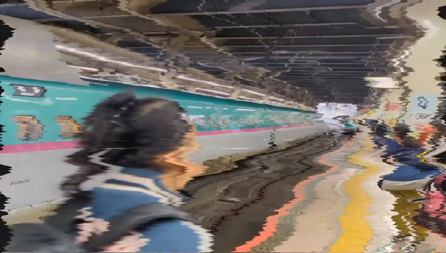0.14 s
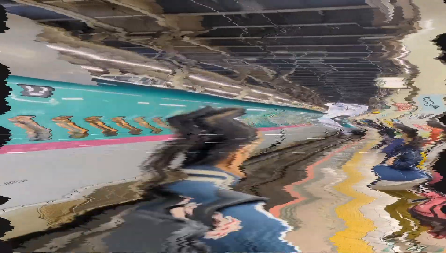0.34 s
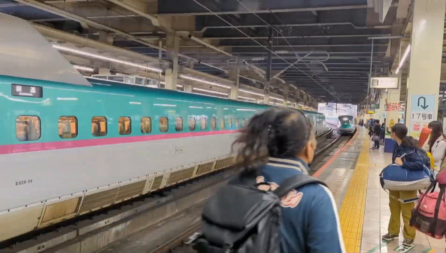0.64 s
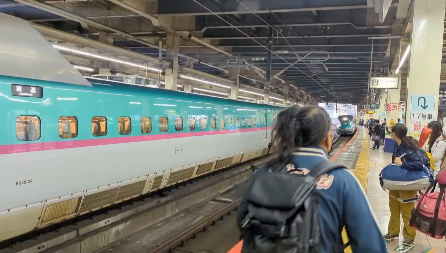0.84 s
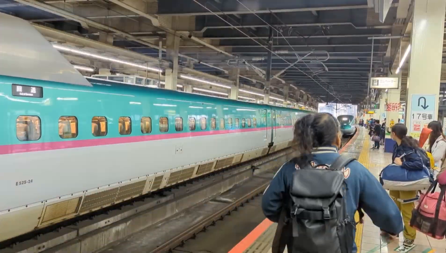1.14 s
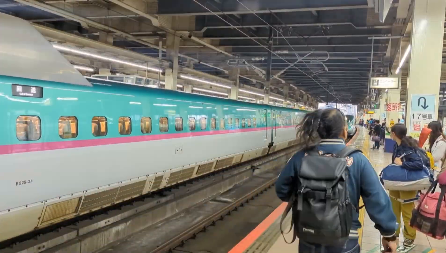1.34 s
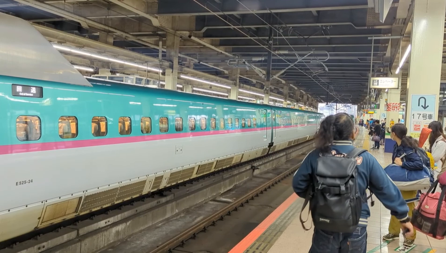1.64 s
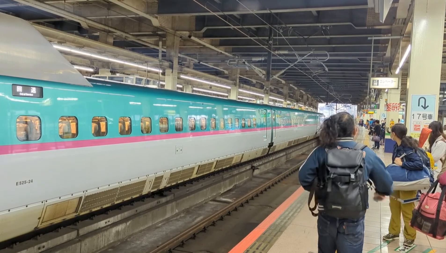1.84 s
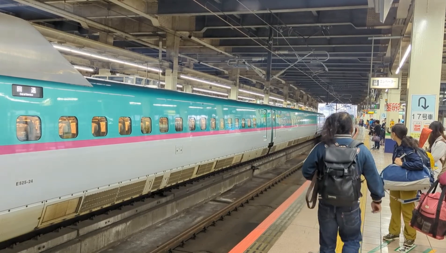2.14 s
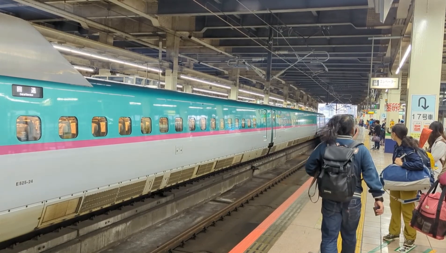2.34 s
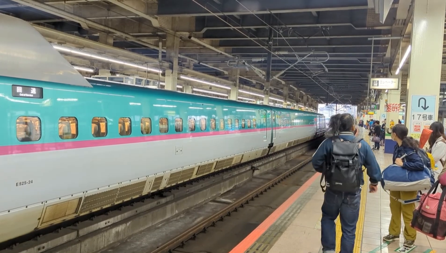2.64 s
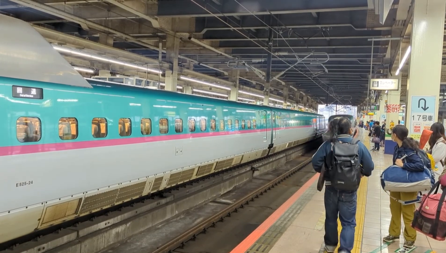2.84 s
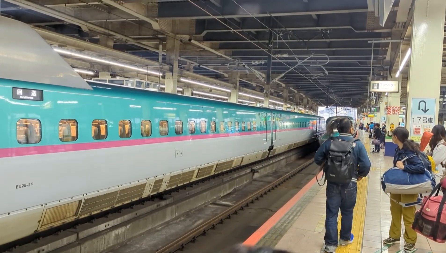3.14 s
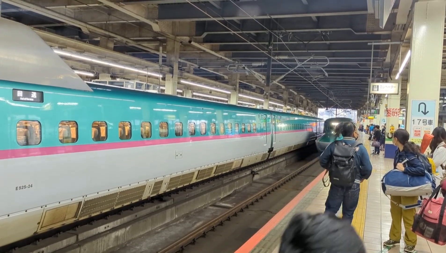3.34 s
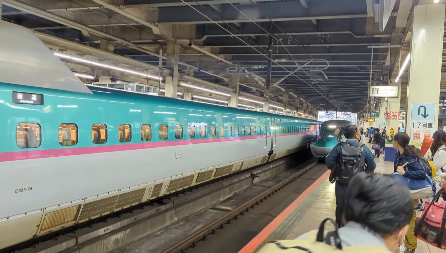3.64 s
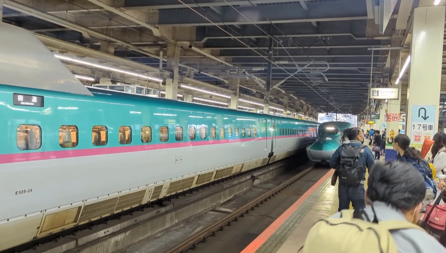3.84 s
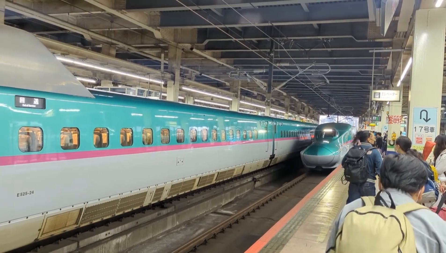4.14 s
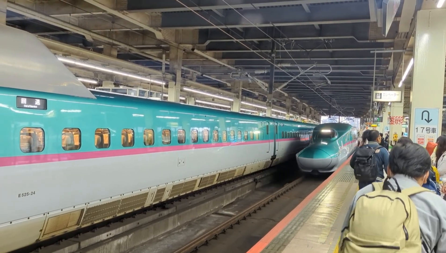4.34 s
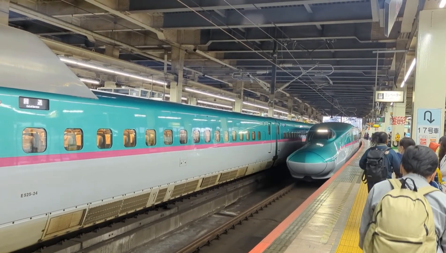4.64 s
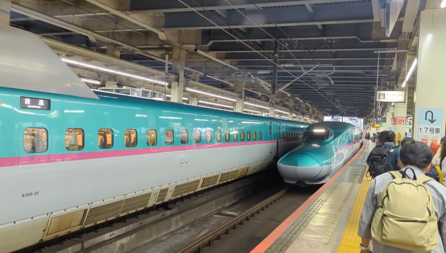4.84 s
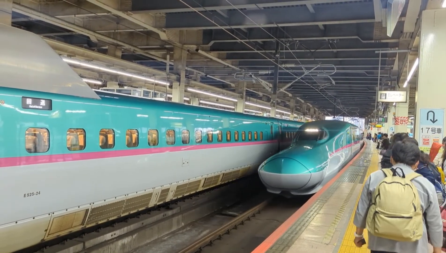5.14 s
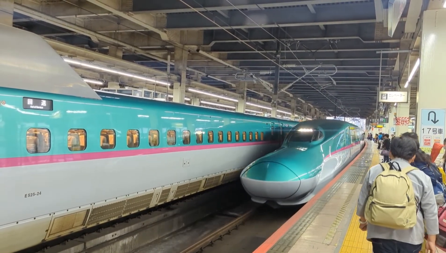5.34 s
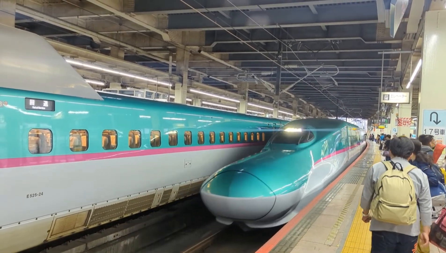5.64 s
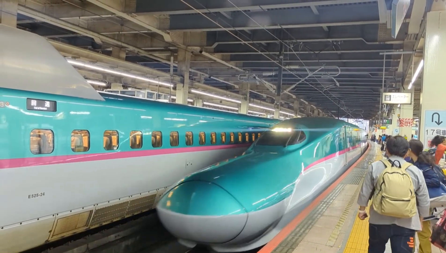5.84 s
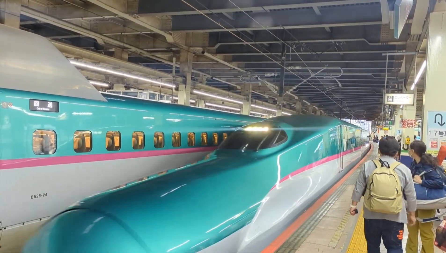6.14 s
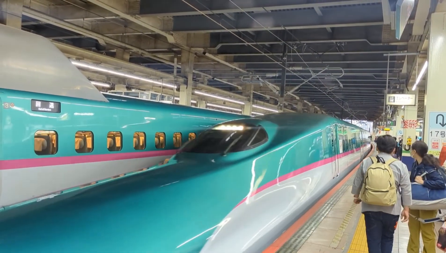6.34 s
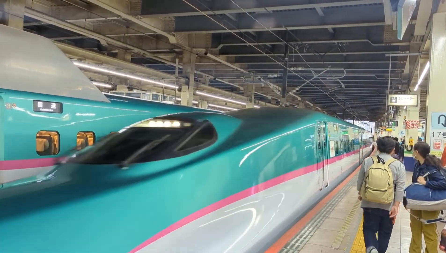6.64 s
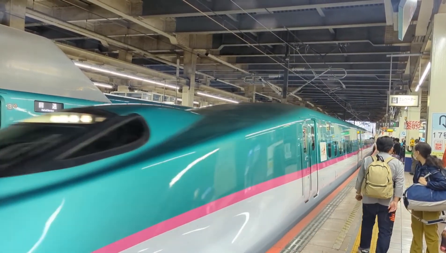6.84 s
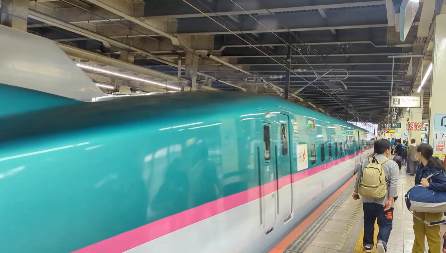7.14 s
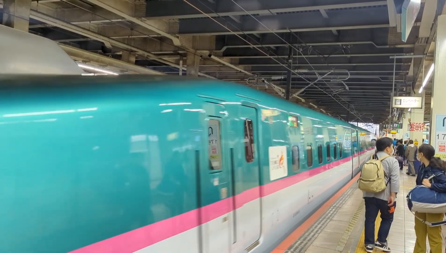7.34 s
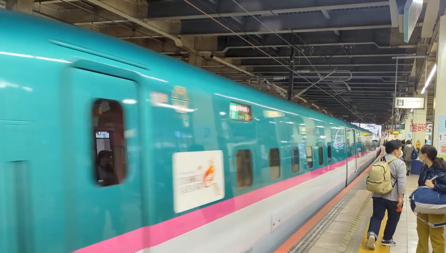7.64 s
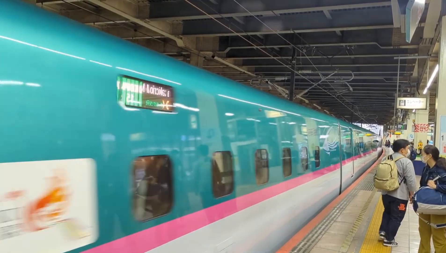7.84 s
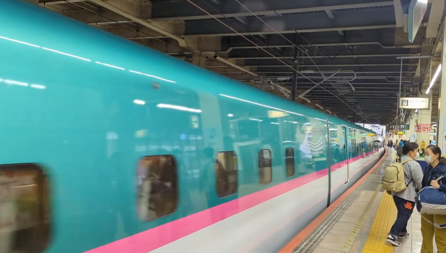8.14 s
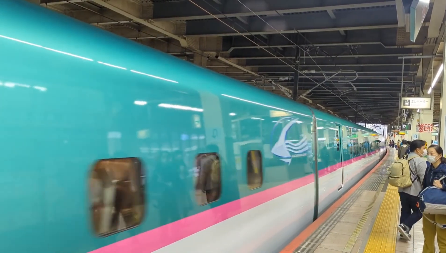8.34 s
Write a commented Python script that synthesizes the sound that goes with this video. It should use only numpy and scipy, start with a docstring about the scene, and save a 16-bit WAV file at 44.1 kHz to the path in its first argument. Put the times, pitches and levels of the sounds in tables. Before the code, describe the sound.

A train runs into a covered station, braking. Low hall roar and fans come first, with a wavering whine that sinks as it slows. The metallic brake squeal grows from thin and distant to close and shrill, with tiny very high squeaks pulsing through the middle. As the nose passes the handheld phone, the squeal drops slightly in pitch and broadens, with airy hiss on the left.

```python
"""The brakes of an electric train squeal in chorus as it runs into a roofed station and its nose slides
past a phone held on the platform: many pads slip and grip near one rate, each giving five harmonics.
The gears whine down with the speed, rising and fading by frequency, and one thin squeak swells once
a wheel turn. Shaped noise makes the roar of the hall and the hiss of air and wheels; blurred tones make
the hum of a standing train's fans."""
import sys
import numpy as np
from scipy import signal
from scipy.fft import rfft, irfft, next_fast_len
from scipy.io import wavfile
from scipy.ndimage import uniform_filter1d, minimum_filter1d

SR = 44100
rng = np.random.default_rng(int(sys.argv[2]) if len(sys.argv) > 2 else 0)


def output_pcm(signal):
    """Save a mono or channel-first signal as 16-bit PCM at the path in sys.argv[1].

    Samples are clipped to [-1, 1] before scaling.
    """
    pcm = np.clip(np.atleast_2d(signal).T, -1, 1) * 32767
    wavfile.write(sys.argv[1], SR, np.round(pcm).astype(np.int16))


N = 374409

# Coherence of the sound field at the two ports of the phone.
# Each row: frequency in Hz, left-right correlation from -1 to 1.
LIKENESS = [(45, .99), (90, .988), (180, .972), (350, .87), (700, .53), (1400, -.08), (4000, 0), (9000, .2),
            (16000, .2)]


def undb(db):
    """Definition of level: the amplitude ratio is 10 to the power dB / 20."""
    return 10 ** (np.asarray(db) / 20)


def unit(x):
    """Normalisation by the root mean square, which becomes 1."""
    return x / np.sqrt(np.mean(x ** 2))


def curves(table):
    """Linear interpolation in time: the columns after the first (in seconds), sample by sample."""
    s, *columns = np.transpose(table)
    return [np.interp(np.arange(N) / SR, s, column) for column in columns]


def over_log_hz(table, hz):
    """Linear interpolation of a table's second column over the logarithm of frequency."""
    table_hz, values = np.transpose(table)
    return np.interp(np.log(hz), np.log(table_hz), values)


def step(at_s, width_s):
    """Sigmoid transition from 0 to 1 about a moment."""
    return .5 + .5 * np.tanh((np.arange(N) / SR - at_s) / (2 * width_s))


def walk(rate_hz):
    """Band-limited random modulation: values held for 1 / rate, smoothed twice, rms 1."""
    hold = max(int(SR / rate_hz), 2)
    held = np.repeat(rng.standard_normal(N // hold + 1), hold)
    smooth = uniform_filter1d(uniform_filter1d(held, hold), hold)
    return unit(smooth[:N])


def sides(left_db):
    """Interaural level difference: gains of left and right, left_db apart."""
    return undb(np.array([left_db, -left_db]) / 2).reshape(2, -1)


def correlated(mid, side, like):
    """Partial coherence: a shared and an opposed part weighted to a left-right correlation."""
    return np.sqrt(1 + like) * mid + np.sqrt(1 - like) * side * np.array([[1], [-1]])


def rotor(hz):
    """Phasor of an oscillator: phase is the integral of frequency, from a random start."""
    return np.exp(2j * np.pi * (np.cumsum(hz) / SR + rng.random())).astype(np.complex64)


def field(spectrum, swell_db, flicker_db, bass_db=0, middle_db=0, treble_db=0):
    """Diffuse field: partly coherent noise in octave bands that swell together and flicker alone."""
    size = next_fast_len(N)
    hz = np.maximum(np.fft.rfftfreq(size, 1 / SR), 1)
    like = np.clip(over_log_hz(LIKENESS, hz), -1, 1)
    mid, side = rfft(rng.standard_normal((2, size))) * undb(over_log_hz(spectrum, hz))
    both = correlated(mid, side, like)
    out, swell = 0, swell_db * walk(3.16)
    for centre in 2. ** np.arange(5, 15):  # Hz
        band = np.clip(1 - np.abs(np.log2(hz / centre)), 0, 1)
        level_db = swell + flicker_db * walk(9)
        level_db = level_db + bass_db * (centre < 150)
        level_db = level_db + middle_db * (400 < centre < 1200)
        level_db = level_db + treble_db * (centre > 12000)
        out = out + irfft(both * band, size)[:, :N] * undb(level_db)
    return unit(out)


def wavering(hz, width_hz, steady=0.):
    """Multipath interference: echoes blur a tone, unlike at each port, about a steady direct share."""
    def blur():
        return (steady + walk(width_hz) + 1j * walk(width_hz)) / np.sqrt(1 + steady ** 2 / 2)

    tone = rotor(hz)
    like = np.clip(over_log_hz(LIKENESS, np.mean(hz)), 0, 1)
    mid, side = (tone * blur()).imag, (tone * blur()).real
    return correlated(mid, side, like) / np.sqrt(2)  # rms near 1


def hall():
    """Reverberant field: roar under the roof with fan tones in it, and broadband hiss of the cars."""
    # Each row: start in seconds, level of the roar in dB, level of the hiss near 4.5 kHz in dB.
    noise_levels = [(0, -27.5, -60), (.45, -21, -52), (.9, -20, -51), (1.75, -19.5, -49), (2.1, -19, -49.5),
                    (2.66, -19.5, -49), (2.96, -19.5, -48.5), (3.55, -18, -47.5), (3.76, -19.5, -47),
                    (3.86, -18.5, -45), (4.05, -19, -47.5), (4.62, -18.5, -45), (4.74, -22, -47),
                    (5.5, -24, -45.5), (5.85, -23.5, -45.5), (6.1, -26.5, -48.5), (6.3, -25.5, -46.5),
                    (7.35, -21.5, -41), (7.7, -22.5, -43.5), (8.49, -22, -43.5)]
    # Spectrum of the roar. Each row: frequency in Hz, relative density in dB per Hz.
    roar_spectrum = [(15, -55), (25, -54), (57, -3), (85, -1), (192, -3.5), (358, -5), (427, -6.5),
                     (528, -8.5), (707, -9), (965, -13.5), (1700, -15), (2600, -25.5), (3380, -32),
                     (5720, -120)]
    # Spectrum of the hiss, with a narrow gap near 8 kHz.
    # Each row: frequency in Hz, relative density in dB per Hz.
    hiss_spectrum = [(300, -10.5), (900, -10), (2000, -0.5), (3500, -5), (5000, -12), (7200, -12.5),
                     (8000, -33.5), (8800, -11), (10500, -16), (12500, -20.5), (13800, -18), (15500, -30)]
    # Fans of a standing train. Each row: frequency in Hz, blur rate in Hz, level re the roar in dB.
    fan_tones = [(98.1, 50, -17), (194.6, 40, -17), (438.7, 30, -18), (1185, 35, -24), (1638, 30, -23)]
    # Rumble of the viaduct. Each row: start in seconds, gain of the roar below 150 Hz in dB.
    rumble_curve = [(0, -1), (1, 1.5), (1.6, 2), (2.3, 1.5), (3.2, 0.5), (3.8, 0.5), (4.5, -0.5), (5.2, 1),
                    (5.9, 0), (6.6, -0.5), (7.5, 0), (8.49, -2.5)]
    # Brief swells in the middle of the roar. Each row: peak in seconds, half length in seconds, gain in dB.
    surges = [(2.8, .09, 3), (3.88, .06, 2)]
    # Each row: start in seconds, gain of the top octave of the hiss in dB.
    treble_curve = [(0, -0.5), (2.5, 1.5), (4.5, 1.5), (8.49, -5)]
    whole_hiss_db = 16  # whole hiss relative to its part near 4.5 kHz
    hiss_left_db = 2  # the cars pass on the left

    roar_db, hiss_db = curves(noise_levels)
    rumble_db = curves(rumble_curve)[0] + .4 * walk(1.42)
    t = np.arange(N) / SR
    surge_db = sum(db * np.exp(-((t - s) / half) ** 2 / 2) for s, half, db in surges)
    roar = field(roar_spectrum, .52, .76, bass_db=rumble_db, middle_db=surge_db)
    fans = sum(wavering(np.full(N, 1. * hz), width) * undb(db) for hz, width, db in fan_tones)
    hiss = field(hiss_spectrum, swell_db=.7, flicker_db=.9, treble_db=curves(treble_curve)[0])
    hiss = hiss * sides(hiss_left_db)
    return (roar + fans) * undb(roar_db) + hiss * undb(hiss_db + whole_hiss_db)


def chorus():
    """Doppler shift and distance: pitch, balance and spread of the squeal as the nose nears and passes."""
    # Each row: start in seconds, level of the 2nd harmonic in dB before the make-up gain in brakes().
    squeal_curve = [(0, -40), (.4, -33), (1.4, -26.5), (1.9, -23), (3.4, -17.5), (4.2, -13.5), (4.7, -13),
                    (5.7, -12), (6.2, -13.5), (6.6, -13), (7.4, -12.5), (8, -14.5), (8.49, -15.5)]
    t, passed = np.arange(N) / SR, step(6.4, .33)  # middle and width of the passing in s
    # the slip rate sags with the speed and drops as the cars turn from coming to going
    slip_hz, sag_hz_per_s, pass_drop_hz = 3182, 7, 70.1
    wander_percent = .17  # slow drift of the whole chorus, rms
    hz = slip_hz - sag_hz_per_s * t - pass_drop_hz * passed
    hz = hz * (1 + wander_percent / 100 * walk(5))
    # harmonics 1, 3 and 4 in dB relative to the 2nd; the upper two carry once the cars are near
    first_db = -10 - 1.01 * t + 8.5 * passed
    third_db = -41 + 14 * step(3.9, .8)
    fourth_db = -29 + 10 * step(4.1, .85)
    spread_percent = .75 + .9 * passed  # pitch spread for a pad offset of 1
    stray_db = -3 - .7 * t - 11 * passed  # share of the stray pads
    pan_db = -3.5 + 5 * passed  # left minus right, 2nd harmonic only
    squeal_db = curves(squeal_curve)[0]
    return hz, squeal_db, first_db, third_db, fourth_db, spread_percent, stray_db, pan_db


def brakes():
    """Stick-slip friction: pads slip at their own wavering rates; each port hears another mix of echoes."""
    # Each row: pitch offset in multiples of the spread, level in dB.
    pad_table = [(0, -3.5), (-.5, -6), (.6, -7), (-1.2, -3.5), (1.2, -3.5), (.25, -4), (-.25, -6),
                 (.9, -7.5), (-.85, -5), (.42, -6.5)]
    # Pads of far cars, each on its own pitch. Each row: slip rate in Hz, level in dB before the stray share.
    stray_table = [(3087, 3.5), (3001, -2.5), (3224, -3.5), (2985, -14), (3373, -18)]
    # Shape of the phone. One entry per harmonic 1-5: left minus right in dB, the 2nd before its pan.
    left_db = [3.5, 0.5, 2.5, 0.5, -1]
    # One entry per harmonic 1-5: depth of the fast chatter in dB re 1, before the cars run alongside.
    chatter_db = [2, -6, -1, -6, -10]
    # One entry per harmonic 1-5: change of that depth in dB once the cars run alongside.
    pass_chatter_db = [-5, -1, 0, 4, 0]
    pad_jitter, stray_jitter = .33, .8  # fast wavering of the slip rate, rms %
    # loss in dB from one harmonic to the next: per unit of pad offset (the nearest pads set the pitch),
    # and for stray pads, which are further off and so duller
    pad_tilt_db, stray_tilt_db = -3.5, -2

    hz, squeal_db, first_db, third_db, fourth_db, spread_percent, stray_db, pan_db = chorus()
    pads = [(hz * (1 + offset * spread_percent / 100), db, pad_tilt_db * abs(offset), pad_jitter)
            for offset, db in pad_table]
    pads += [(f, db + stray_db, stray_tilt_db, stray_jitter) for f, db in stray_table]
    alongside = step(6.4, .33)
    depth = [undb(before + change * alongside).astype(np.float32)
             for before, change in zip(chatter_db, pass_chatter_db)]

    out = np.zeros((5, 2, N), np.float32)
    for port in range(2):
        for pad_hz, pad_db, tilt_db, jitter in pads:
            waver = 1 + (.35 * walk(22) + jitter * walk(400)) / 100
            slip = rotor(pad_hz * waver) * np.float32(undb(tilt_db))
            # two tilts are undone beforehand, so the pad level holds at the 2nd harmonic
            wave = undb(pad_db - 2 * tilt_db + 1.9 * walk(40)).astype(np.complex64)
            # the rough disc shakes the contact, which spreads every harmonic by a few hundred Hz
            chatter = unit(walk(720) + .75 * walk(260)).astype(np.float32)
            for k in range(5):
                wave = wave * slip  # powers of the pointer are the harmonics
                out[k, port] += wave.imag * (1 + depth[k] * chatter)
    # level each harmonic over a quarter second, so that the curves alone set its course
    out /= np.sqrt(uniform_filter1d(np.mean(out ** 2, axis=1), size=SR // 4))[:, None]

    # the grip of all pads flutters, more so on harmonics 3-5
    squeal_db = squeal_db + .63 * walk(9)
    top_flutter_db = 1.4 * walk(8)
    third_db, fourth_db = third_db + top_flutter_db, fourth_db + top_flutter_db
    # the 1st harmonic comes in patches and is weak from afar
    first_db = first_db + 1.17 * walk(14) - 2 * (1 - step(1.1, .15))
    levels_db = [first_db, 0, third_db, fourth_db, fourth_db - 28]
    makeup_db = 4
    tones = [out[k] * undb(squeal_db + makeup_db + levels_db[k]) * sides(left_db[k]) for k in range(5)]
    tones[1] = tones[1] * sides(pan_db)
    return sum(tones)


def mesh():
    """Gear kinematics: the tooth rate in Hz follows the speed, and the braking eases off slowly."""
    t = np.arange(N) / SR
    return 762 - 46.5 * t + .98 * t ** 2


def gears():
    """Gear-mesh harmonics: the tooth rate and its multiples glide down, rising and fading by frequency."""
    # One entry per multiple 1-4 of the tooth rate: level in dB before the rises and fades.
    multiples_db = [-36.5, -50.5, -50.5, -54.5]
    # Rises and fades of the whine by frequency: broad resonances, and narrow rows for slow fades of
    # the lowest tone. Each row: frequency in Hz, width in Hz, gain in dB.
    whine_gains = [(460, 10, 5), (474, 5, -3), (512, 8, -2), (540, 15, 3), (575, 12, 1), (594, 8, 9),
                   (618, 20, 1.5), (685, 12, -3), (728, 14, 3), (915, 22, 13), (1355, 45, 14),
                   (1570, 75, 5), (1720, 84, 10), (1860, 60, 13), (1950, 39, 9), (2030, 30, 5),
                   (2155, 85, 20.5)]
    # Rise out of the distance, one row per multiple. Each row: moment in seconds, gain before it in dB.
    emerge = [(.45, -11), (2.7, -12), (2.4, -11), (4.7, -9)]
    waver_percent = .45  # rms; the motor cars differ
    tooth_hz = mesh()
    hz, out = tooth_hz * (1 + waver_percent / 100 * walk(16)), 0
    for k, (db, (at_s, far_db)) in enumerate(zip(multiples_db, emerge)):
        whine_db = sum(gain_db * np.exp(-((k + 1) * tooth_hz - f) ** 2 / (2 * width ** 2))
                       for f, width, gain_db in whine_gains)
        path_db = far_db * (1 - step(at_s, .09))
        path_db = path_db + 2.2 * walk(28)  # the tones break up as they bounce along the platform
        if k == 3:
            path_db = path_db - 19 * step(7.55, .1)  # the car sides hide the 4th multiple
        tone = wavering((k + 1) * hz, 60 + 40 * k, steady=1.3)
        out = out + tone * undb(db + whine_db + path_db)
    return out


def squeak():
    """Periodic amplitude modulation: a thin, slowly falling tone swells once a wheel turn, then fades."""
    # Each row: start in seconds, level between swells in dB, level the swells add in dB,
    # both before a final gain of 0.5 dB.
    squeak_curve = [(0, -65, -54), (.5, -64, -50), (1.1, -60, -51), (2, -60, -40), (2.6, -55, -41),
                    (3.4, -47, -38), (4.4, -47, -37), (5.3, -48, -39), (5.7, -50, -55), (6.6, -75, -80)]
    mesh_per_turn = 133.5  # tooth-mesh cycles per wheel turn
    first_swell_s, swell_s = .125, .041  # moment of the first swell, width of each
    between_db, top_db = curves(squeak_curve)
    hz = 12340 - 8 * np.arange(N) / SR
    turn_hz = mesh() / mesh_per_turn
    turns = np.cumsum(turn_hz) / SR - first_swell_s * turn_hz[0]
    from_swell_s = (turns - np.round(turns)) / turn_hz
    swells = np.exp(-(from_swell_s / swell_s) ** 2 / 2) * undb(top_db + .8 * walk(4.7))
    return wavering(hz, 140, steady=2.2) * (undb(between_db) + swells) * undb(.5)


def scene():
    """Superposition of all sources at the two ports."""
    return hall() + brakes() + gears() + squeak()


def record(dry):
    """Peak limiting and low-pass filtering: both channels dip around the loudest peaks; the top is cut."""
    limit, limit_s, top_hz = .9, .012, 15735  # peak before the filter, time of the gain's moves, cutoff
    span = int(limit_s * SR)
    room = np.minimum(1, limit / (np.abs(dry).max(axis=0) + 1e-9))
    gain = uniform_filter1d(minimum_filter1d(room, size=span), size=span)
    low_pass = signal.ellip(14, .1, 80, top_hz, fs=SR, output="sos")
    return signal.sosfilt(low_pass, dry * gain)


dry = scene()
out = record(dry)
output_pcm(out)
```